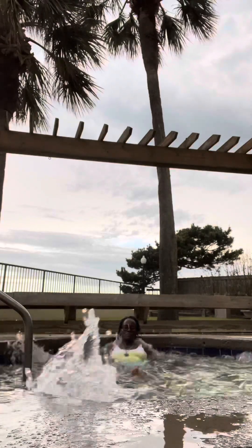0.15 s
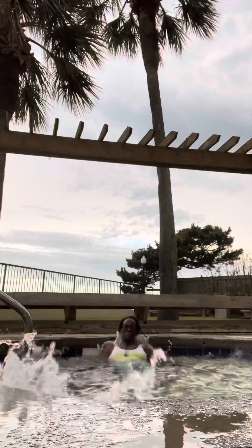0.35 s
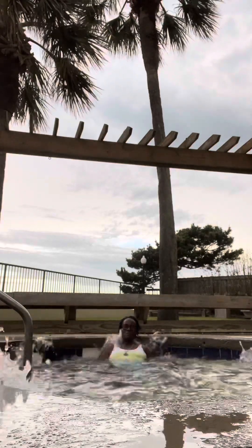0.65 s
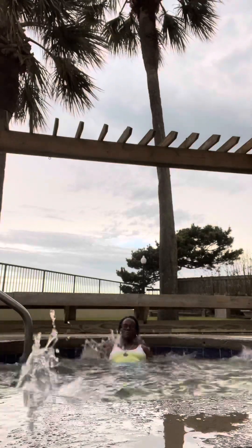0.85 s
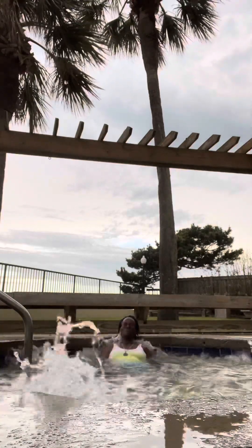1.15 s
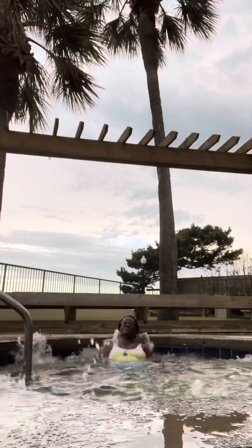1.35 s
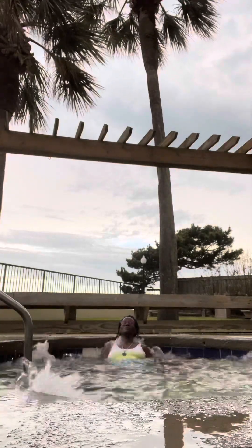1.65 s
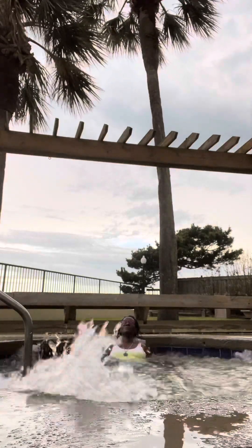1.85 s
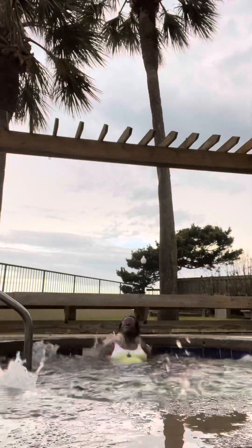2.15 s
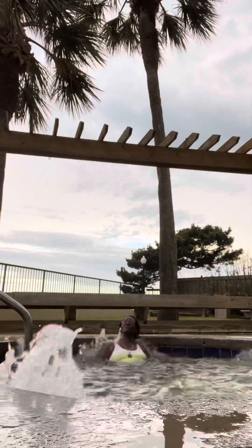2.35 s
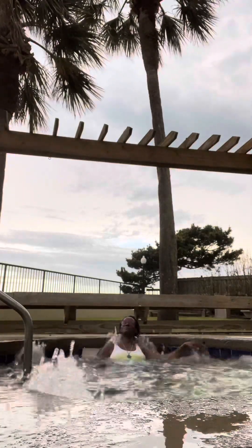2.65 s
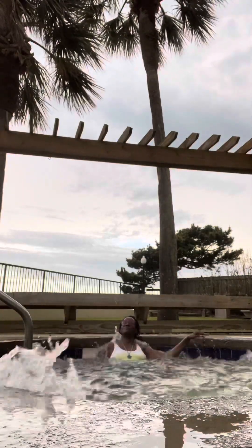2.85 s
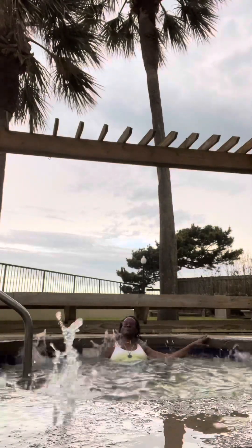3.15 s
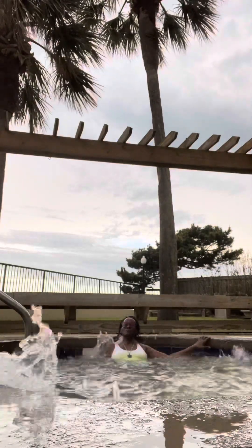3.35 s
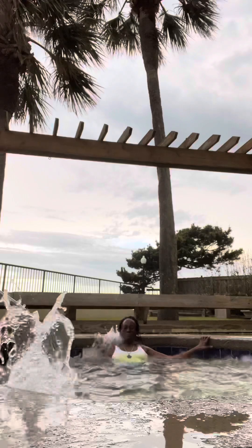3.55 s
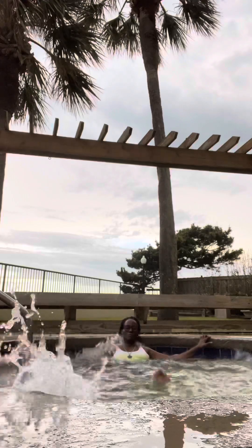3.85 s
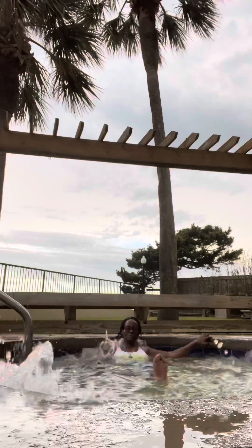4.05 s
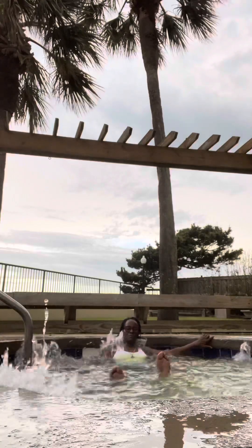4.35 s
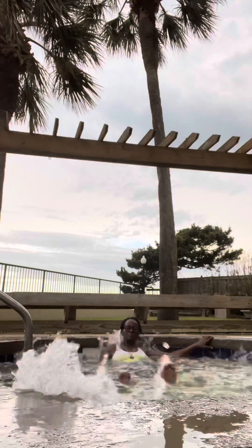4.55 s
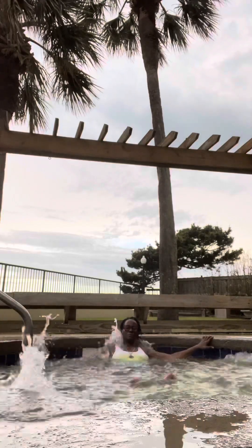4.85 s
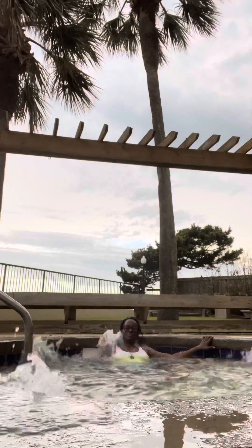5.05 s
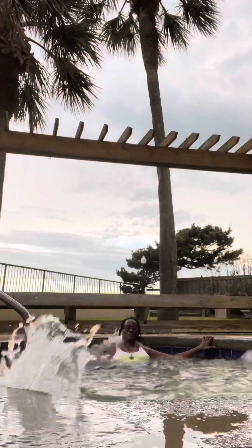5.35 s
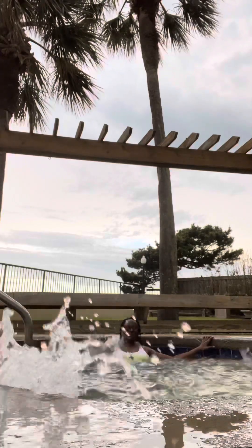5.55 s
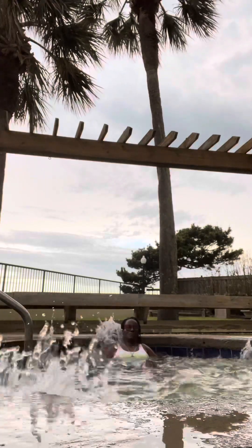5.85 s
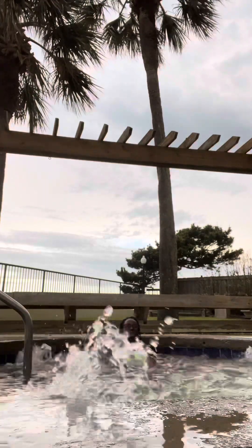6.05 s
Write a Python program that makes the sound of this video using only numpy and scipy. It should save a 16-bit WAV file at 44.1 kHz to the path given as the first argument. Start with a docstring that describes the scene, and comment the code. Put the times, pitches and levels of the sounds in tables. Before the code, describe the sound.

Close by in the open air, hot tub water bubbles, hisses and splashes without a break as the jets stir it. Scattered through the wash are round glugs, small ringing drips and sharp ticks of drops landing on the rim. Wind puffs and flaps against the microphone the whole time, shifting in width and thumping most deeply after about three seconds, while the water carries on evenly.

```python
"""Jet-churned water in an outdoor tub, a step away: a bubbling wash and the fizz of bursting froth.
Large bubbles glug; single drops ring in the water or slap the wet rim.
Gusty wind rumbles, flutters and puffs over two microphone ports, now alike in both, now opposed.
Washes are shaped noise; bubbles, drops and puffs are short decaying sines that rise in pitch."""
import sys
import numpy as np
from scipy import signal
from scipy.fft import rfft, irfft, next_fast_len
from scipy.io import wavfile
from scipy.ndimage import uniform_filter1d

SR = 44100
rng = np.random.default_rng(int(sys.argv[2]) if len(sys.argv) > 2 else 0)


def dump(signal):
    """Clip the signal to [-1, 1] and save it as 16-bit WAV at the path in sys.argv[1]."""
    limited = np.clip(np.atleast_2d(signal).T, -1, 1)
    pcm = np.round(limited * 32767).astype(np.int16)
    wavfile.write(sys.argv[1], SR, pcm)


N = 272979

# water before splashes and lulls: t/s, churn level/dB, spray level/dB
WATER_LEVELS = [(0, -30.5, -36.5), (.3, -29.5, -38.5), (.9, -29, -37), (1.65, -31, -37), (1.85, -30, -40),
                (2.05, -30.5, -37), (2.5, -29, -36.5), (3.55, -30.5, -38.5), (3.98, -29, -38),
                (4.33, -31, -38.5), (4.55, -28, -37.5), (4.8, -31, -37), (5.5, -29, -37.5),
                (5.95, -29, -36.5), (6.09, -28.5, -39), (6.19, -32, -38)]
# bubbling body: f/Hz, relative density/dB
CHURN_SPECTRUM = [(88, -16), (150, -8), (272, -26), (359, -2.5), (483, -7.5), (592, -2), (683, -8),
                  (798, -7), (1200, -10.5), (1700, -12.5), (1900, -16), (2280, -17.5), (2600, -35),
                  (3380, -48), (5720, -120)]
# bursting froth: f/Hz, relative density/dB
SPRAY_SPECTRUM = [(700, -90), (1500, -30), (2400, -1), (2800, 0), (3750, -2.3), (4000, .3), (4250, .8),
                  (4650, -3.7), (5200, -4), (6000, -4.7), (8000, -7.3), (10000, -9.8), (12000, -10.6),
                  (14300, -12), (15700, -15)]
# froth thrown up by the jets: peak t/s, spray lift/dB
SPLASH_LIFTS = [(.17, 2), (.3, 1.5), (.52, 2), (.79, 2), (1.45, 1.5), (2.02, 1.5), (2.18, 2), (3.2, 2),
                (3.75, 2.5), (3.86, 3), (4.16, 2.5), (4.63, 1), (4.73, 2.5), (5.37, 1), (5.72, 4), (6.0, 3)]
# brief dips shared by churn and flutter: t/s, gain/dB
LULL_GAINS = [(.41, -5), (.825, -2.5), (.85, -2.5), (.885, -5), (.94, -4), (1.01, -3.5), (1.045, -2),
              (1.095, -1), (1.228, -7), (1.96, -4), (3.7, -2), (3.985, -4), (4.28, -2.5), (5.45, 0),
              (5.49, -2), (5.635, 1)]
# large bursting bubbles: t/s, peak/dB, f/Hz
GLUG_EVENTS = [(.288, -27, 1560), (.857, -25, 950), (1.115, -25.5, 545), (1.195, -23, 515),
               (1.26, -28, 617), (1.662, -22.5, 550), (2.416, -29, 860), (3.363, -25, 533),
               (3.414, -20, 597), (3.533, -22.5, 625), (4.217, -20, 560), (4.247, -21.5, 558),
               (4.489, -23, 402), (4.636, -22, 550), (5.268, -21, 410), (5.358, -23, 810),
               (5.787, -23, 724), (6.045, -23, 558), (6.135, -23, 520)]
# drops into the water: t/s, peak/dB, f/Hz
DROP_EVENTS = [(0.469, -27.5, 4060), (0.9, -33, 2900), (1.0232, -23.5, 4270), (1.4205, -33, 4000),
               (1.6305, -27, 4400), (1.696, -33, 2200), (2.4683, -36, 2420), (2.5526, -25, 2240),
               (2.649, -30, 4200), (3.0131, -30, 3380), (3.7313, -27.5, 3420), (4.155, -25, 3160),
               (4.2373, -31, 2630), (4.517, -30.5, 2480), (4.716, -37, 2370), (5.3636, -27.5, 4000),
               (5.7049, -32, 2550), (5.8835, -36, 2700)]
# drops onto the rim: t/s, peak/dB, f/Hz
SLAP_EVENTS = [(0.297, -20, 6900), (0.87, -23.5, 6700), (1.489, -24, 5840), (2.177, -21, 5850),
               (2.2692, -21.5, 6270), (2.425, -31, 6800), (2.47, -21, 4260), (2.61, -30, 6550),
               (2.6467, -23, 7600), (3.669, -25, 5160), (4.569, -31, 9500), (4.6192, -32, 15300),
               (4.6195, -25, 6300), (4.6228, -23, 9200), (4.6258, -19, 6500), (5.441, -26, 7140),
               (5.463, -36, 15300), (5.464, -27, 9500)]
# wind between puffs: t/s, rumble level/dB, flutter level/dB, pitch factor of flutter and crosswind
WIND_LEVELS = [(0, -36, -34, 1.13), (.22, -28, -27.5, 1.15), (.6, -35, -30.5, 1.12), (1.0, -37, -36.5, 1.3),
               (1.36, -27.5, -27, 1.16), (1.622, -40, -27.5, 1.44), (1.95, -31, -28.5, 1.3),
               (2.1, -39, -24.5, 0.9), (2.8, -38, -22, 0.94), (3.0, -46, -25, 0.83), (3.1, -27, -24, 0.69),
               (3.45, -27, -23.5, 0.87), (3.72, -27, -28.5, 0.78), (3.97, -29, -25, 0.86),
               (4.3, -31.5, -26, 1.3), (4.9, -35.5, -27, 1.2), (5.05, -37, -27, 1), (5.36, -39, -27, 0.92),
               (5.48, -37.5, -32.5, 1.5), (5.72, -29, -26.5, 0.98), (5.9, -31.5, -30, 1.5),
               (6.19, -34, -29.5, 1)]
# wind opposed in the ports: t/s, level/dB
CROSSWIND_LEVELS = [(0, -31), (.4, -22.5), (.56, -28.5), (.72, -24.5), (1.04, -21.5), (1.38, -24.5),
                    (1.52, -36), (2.0, -46), (3.06, -53), (3.15, -22), (3.3, -45), (3.8, -29.5), (3.9, -22),
                    (4.6, -30), (4.74, -36), (5.1, -39), (5.2, -30.5), (6.19, -28)]
# deep wind: f/Hz, relative density/dB
RUMBLE_SPECTRUM = [(15, -35), (34, -42), (50, -8.5), (70, 4), (110, -1.5), (150, -5), (250, -32),
                   (900, -100)]
# flapping wind at pitch factor 1: f/Hz, relative density/dB
FLUTTER_SPECTRUM = [(25, -70), (70, -33), (130, 3.5), (200, -0.5), (290, 2.5), (400, -2.5), (560, -8.5),
                    (1000, -18.5), (3000, -100)]
# opposed wind at pitch factor 1: f/Hz, relative density/dB
CROSSWIND_SPECTRUM = [(25, -38), (60, -16), (140, -0.5), (330, -1.5), (560, -11), (900, -20), (1500, -35),
                      (4000, -100)]
# deep buffets to light flaps: t/s, peak/dB, nominal f/Hz
PUFF_EVENTS = [(0.243, -15, 195), (0.356, -24, 250), (0.707, -16.5, 298), (0.808, -15, 84),
               (0.876, -23.5, 310), (0.901, -21.5, 450), (.902, -22.5, 115), (0.977, -20.5, 300),
               (1.058, -22, 322), (1.073, -21, 177), (1.114, -21, 322), (1.251, -17, 158),
               (1.264, -17, 327), (1.408, -18.5, 318), (1.498, -19.5, 370), (1.735, -17.5, 307),
               (1.867, -15, 290), (2.024, -15.5, 278), (2.049, -14.5, 341), (2.33, -14, 202),
               (2.475, -13.5, 287), (2.876, -17.5, 189), (3.099, -11, 370), (3.329, -17, 258),
               (3.364, -11, 118), (3.413, -15.5, 288), (3.434, -14, 93), (3.452, -14, 80),
               (3.484, -14, 251), (3.56, -23, 65), (3.598, -16.5, 67), (3.616, -15.5, 243),
               (3.694, -21, 70), (3.759, -14.5, 162), (3.816, -12, 137), (3.817, -13.5, 258),
               (3.834, -8.5, 75), (3.863, -13, 72), (3.878, -14, 70), (4.195, -19.5, 218),
               (4.327, -18, 151), (4.35, -24.5, 328), (4.431, -12, 107), (4.439, -19.5, 262),
               (4.597, -20.5, 72.4), (4.811, -14, 355), (4.984, -18, 372), (5.025, -20, 107),
               (5.032, -17.5, 496), (5.193, -19, 187), (5.222, -16.5, 274), (5.292, -16.5, 274),
               (5.325, -16, 403), (5.36, -19, 498), (5.572, -19, 286), (5.649, -15.5, 468),
               (5.688, -17, 83.4), (5.715, -15.5, 300), (6.091, -29, 80)]
# port pair: f/Hz, side over mid/dB, in-phase share, quadrature share
PORT_RESPONSE = [(300, -16, 0, 0), (800, -9, -.3, .15), (1200, -4, -.45, .15), (1700, -7, -.25, .2),
                 (2000, -1.5, 0, .1), (2400, -5.5, 0, -.35), (2800, -2.5, 0, -.2), (4200, -7.5, .15, .55),
                 (4800, -1, .3, -.1), (6600, -8, 0, .45), (8000, -3, 0, .65), (10000, 2, 0, .6),
                 (11300, 8, 0, .4), (11750, 14, 0, .2), (11950, 60, 0, 0)]


def churn(lift_db):
    """Jets stir the water: a wash with bubbles, lifted slightly by splashes; two channels."""
    body = wash(CHURN_SPECTRUM, patch_db=1.9, flicker_db=0.5, size=2048, patch_bins=8, channels=2)
    ringing = bubbles(CHURN_SPECTRUM, 400.4, 2444, rate_hz=170, cycles=13, spread_db=2.15, glide=0.038)
    return level(WATER_LEVELS) * lulls() * gain(0.39 * lift_db) * unit_rms(body + gain(-7) * ringing)


def spray(lift_db):
    """Froth bursts: hiss with tiny bubbles, lifted by splashes; two channels."""
    hiss = wash(SPRAY_SPECTRUM, patch_db=1.4, flicker_db=1.06, size=512, patch_bins=8, channels=2)
    fizz = bubbles(SPRAY_SPECTRUM, 2300, 11000, rate_hz=700, cycles=12, spread_db=3.3, glide=0.016)
    return level(WATER_LEVELS, column=2) * gain(lift_db) * unit_rms(hiss + gain(-9) * fizz)


def glugs_and_drops():
    """Large bubbles burst at the surface; drops fall back in and ring."""
    out = np.zeros(N)
    for events, cycles, glide in ((GLUG_EVENTS, 8.9, 0.034), (DROP_EVENTS, 11.2, 0.0048)):
        for t_s, peak_db, f_hz in events:
            add(out, t_s, gain(peak_db) * blip(f_hz, cycles, glide))
    return out


def rim_slaps():
    """Drops slap the wet rim, each with a short spatter; rows: dull, bright."""
    slap_s, spatter_s, bright_hz = 0.0006, 0.003, 12000
    out, age_s = np.zeros((2, N)), np.arange(1200) / SR
    for t_s, peak_db, f_hz in SLAP_EVENTS:
        row = out[int(f_hz > bright_hz)]
        add(row, t_s, gain(peak_db) * blip(f_hz, cycles=f_hz * slap_s, glide=0.014))
        noise = np.convolve(rng.standard_normal(len(age_s)), blip(f_hz, cycles=1.3, glide=0.021))
        spatter = unit_rms(noise[:len(age_s)]) * np.exp(-age_s / spatter_s)
        add(row, t_s, gain(peak_db - 11) * spatter)
    return out


def wind():
    """Lumpy pressure at the ports: rumble, flutter and puffs in mid, veering gusts in side."""
    t_s, peak_db, f_hz = np.transpose(PUFF_EVENTS)
    deep_hz, rise_s, fall_s = 140, 0.015, 0.02
    # deep puffs stir the rumble, light ones the flutter
    deep_stir = swells(t_s + rise_s, gain(peak_db - 14.5) * (f_hz < deep_hz), rise_s, fall_s)
    light_stir = swells(t_s + rise_s, gain(peak_db - 20) * (f_hz >= deep_hz), rise_s, fall_s)
    drift = [(time_s, factor) for time_s, _, _, factor in WIND_LEVELS]
    rumble_mid, rumble_side = rumble(deep_stir)
    mid = rumble_mid + flutter(light_stir, drift) + puffs()
    return mid, crosswind(drift) + gain(-16) * rumble_side


def rumble(stir):
    """Deep wind pressure; two independent channels."""
    noise = wash(RUMBLE_SPECTRUM, patch_db=2.5, flicker_db=0.89, size=2048, patch_bins=2, channels=2)
    return (level(WIND_LEVELS) + stir) * noise


def flutter(stir, drift):
    """Wind flaps over the ports, with rounded gurgles in it."""
    noise = wash(FLUTTER_SPECTRUM, patch_db=1.9, flicker_db=0.58, size=1024, patch_bins=3, drift=drift)
    gurgles = bubbles(FLUTTER_SPECTRUM, 160.4, 483.3, rate_hz=110, cycles=7.15, spread_db=1.9, glide=0.11)
    return (lulls() * level(WIND_LEVELS, column=2) + stir) * unit_rms(noise[0] + gain(-5) * gurgles)


def puffs():
    """Strong puffs roughened by turbulence; deep ones have fewer cycles, less glide, less roughness."""
    light_hz = 300
    smooth, rough = np.zeros((2, N))
    for t_s, peak_db, f_hz in PUFF_EVENTS:
        lightness = min(f_hz / light_hz, 1)
        glide = 0.11 * lightness
        puff = gain(peak_db) * blip(f_hz * (1 - glide), cycles=4.75 * f_hz / light_hz, glide=glide)
        add(smooth, t_s, puff)
        add(rough, t_s, 0.11 * lightness * puff)
    eddies = unit_rms(uniform_filter1d(uniform_filter1d(rng.standard_normal(N), size=150), size=150))
    return smooth + rough * eddies


def crosswind(drift):
    """Opposed port pressure that comes and goes as the gusts veer."""
    noise = wash(CROSSWIND_SPECTRUM, patch_db=2.9, flicker_db=1.7, size=1024, patch_bins=5, drift=drift)
    return level(CROSSWIND_LEVELS) * noise[0]


def ports(near, diffuse):
    """Mid and side of two spaced ports; in the high treble their pressures are nearly opposite."""
    n = next_fast_len(N, True)
    f_hz = np.fft.rfftfreq(n, 1 / SR)
    near, diffuse = rfft(near, n), rfft(diffuse, n)
    side_ratio = gain(at_hz(PORT_RESPONSE, f_hz))
    in_phase = np.clip(at_hz(PORT_RESPONSE, f_hz, column=2), -0.6, 0.6)
    quadrature = np.clip(at_hz(PORT_RESPONSE, f_hz, column=3), -0.75, 0.75)
    coherence = in_phase - 1j * quadrature
    side = coherence * near - 1j * np.sqrt(1 - abs(coherence) ** 2) * diffuse
    mid_gain = 1 / np.sqrt(1 + side_ratio ** 2)
    return irfft(mid_gain * near, n)[:N], irfft(mid_gain * side_ratio * side, n)[:N]


def wash(spectrum, patch_db, flicker_db, size, patch_bins, channels=1, drift=((0, 1), (1, 1))):
    """Noise with random spectral patches, broadband flicker and optional pitch drift; rms 1."""
    frames, f_hz = 4 * N // size + 5, np.fft.rfftfreq(size, 1 / SR)
    patches = uniform_filter1d(rng.standard_normal((frames, len(f_hz))), size=patch_bins, axis=1)
    patches = unit_rms(uniform_filter1d(patches, size=4, axis=0)).T
    flicker = unit_rms(uniform_filter1d(rng.standard_normal(frames), size=6))
    pitch_factor = np.interp(np.arange(frames) * size / (4 * SR), *np.transpose(drift))
    colour = gain(at_hz(spectrum, f_hz[:, None] / pitch_factor)) / np.sqrt(pitch_factor)
    white = rng.standard_normal((channels, frames, len(f_hz), 2)) @ [1, 1j]
    shaped = white.transpose(0, 2, 1) * colour * gain(patch_db * patches + flicker_db * flicker)
    return unit_rms(signal.istft(shaped, nperseg=size, noverlap=3 * size // 4)[1][:, :N])


def bubbles(spectrum, low_hz, high_hz, rate_hz, cycles, spread_db, glide, pitches=20):
    """Random blips, the high ones short, a few loud; rms 1."""
    onsets = gain(spread_db * np.minimum(rng.exponential(1, N), 5)) * (rng.random(N) < rate_hz / SR)
    pitch_index, out = rng.integers(0, pitches, N), np.zeros(N)
    for k, f_hz in enumerate(np.geomspace(low_hz, high_hz, pitches)):
        weight = gain(at_hz(spectrum, f_hz)) * f_hz  # energy per Hz follows the spectrum
        out += signal.oaconvolve(onsets * (pitch_index == k), weight * blip(f_hz, cycles, glide))[:N]
    return unit_rms(out)


def blip(f_hz, cycles, glide):
    """Sine gliding up from f_hz; the envelope peaks at 1 after cycles / 3 periods, then decays."""
    age = np.arange(int(3 * cycles * SR / f_hz)) * f_hz / (cycles * SR)
    envelope = 3 * age * np.exp(1 - 3 * age)
    return envelope * np.sin(2 * np.pi * cycles * age * (1 + glide * age))


def swells(peaks_s, heights, rise_s, fall_s):
    """Sum of skewed Gaussian humps."""
    grid_s = np.arange(0, N + 64, 64) / SR
    offset_s = grid_s[:, None] - peaks_s
    humps = np.exp(-(offset_s / np.where(offset_s < 0, rise_s, fall_s)) ** 2)
    return np.interp(np.arange(N) / SR, grid_s, humps @ heights)


def lulls():
    """Gain of the brief dips."""
    return gain(swells(*np.transpose(LULL_GAINS), rise_s=0.016, fall_s=0.016))


def level(table, column=1):
    """A dB column over time, as gain."""
    columns = np.transpose(table)
    return gain(np.interp(np.arange(N) / SR, columns[0], columns[column]))


def at_hz(table, f_hz, column=1):
    """A column over log frequency."""
    columns = np.transpose(table)
    return np.interp(np.log(f_hz + 1), np.log(columns[0] + 1), columns[column])


def gain(db):
    return 10 ** (np.asarray(db) / 20)


def unit_rms(x):
    return x / np.sqrt(np.mean(abs(x) ** 2) + 1e-20)


def add(mix, t_s, sound):
    part = mix[round(t_s * SR):][:len(sound)]
    part += sound[:len(part)]


def scene():
    """Water through the port pair, plus wind; left and right."""
    dull_slaps, bright_slaps = rim_slaps()
    lift_db = swells(*np.transpose(SPLASH_LIFTS), rise_s=0.054, fall_s=0.042)
    near, diffuse = churn(lift_db) + spray(lift_db) + glugs_and_drops() + dull_slaps
    mid, side = np.add(ports(near, diffuse), wind())
    mid += bright_slaps  # in phase at both ports
    return np.array([mid + side, mid - side])


def record(dry):
    """Recorder band limit."""
    cutoff_hz = 15760
    lowpass = signal.firwin(1023, cutoff_hz, window=("kaiser", 9), fs=SR)
    return signal.oaconvolve(dry, lowpass[None], "same")


dry = scene()
out = record(dry)
dump(out)
```